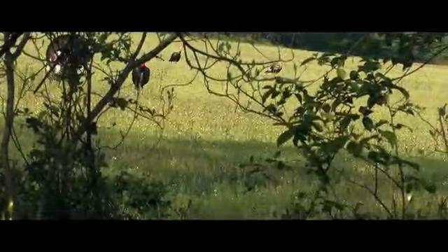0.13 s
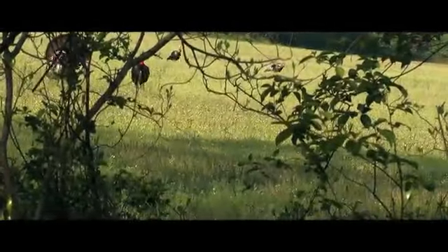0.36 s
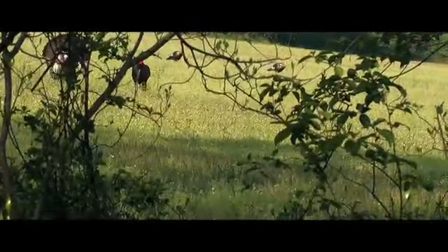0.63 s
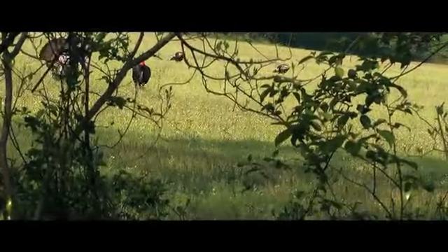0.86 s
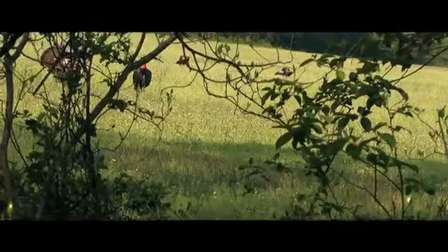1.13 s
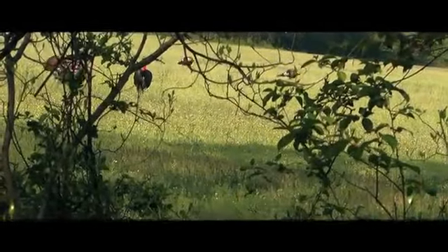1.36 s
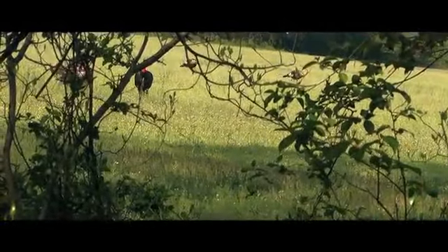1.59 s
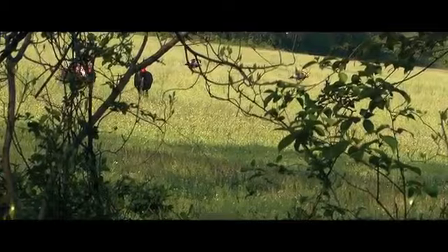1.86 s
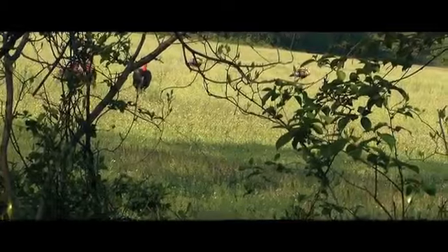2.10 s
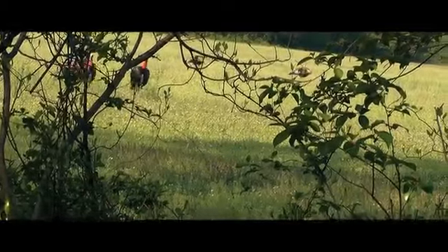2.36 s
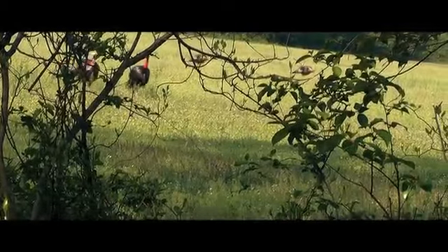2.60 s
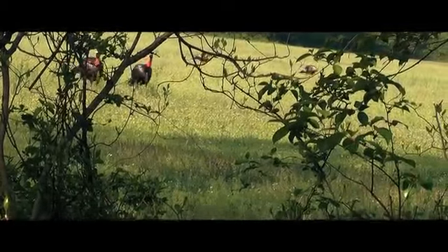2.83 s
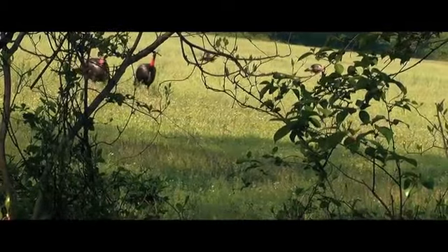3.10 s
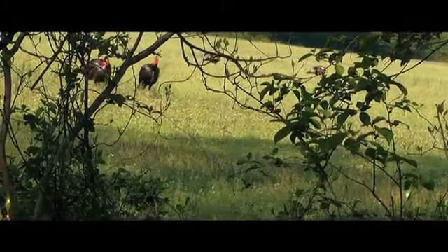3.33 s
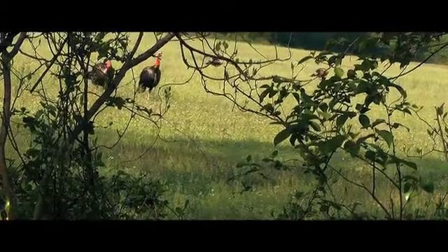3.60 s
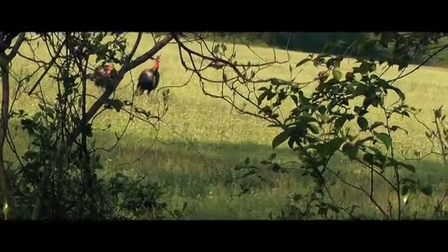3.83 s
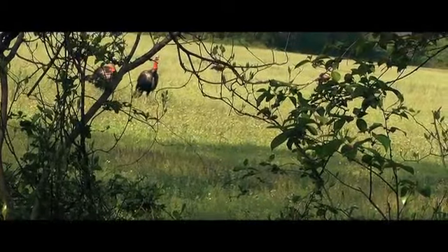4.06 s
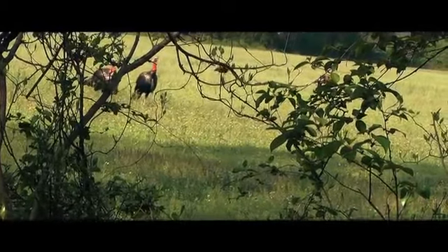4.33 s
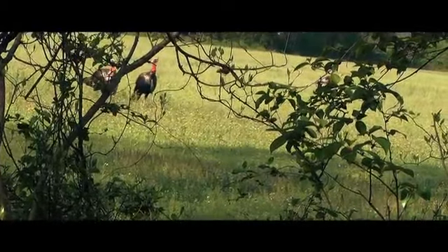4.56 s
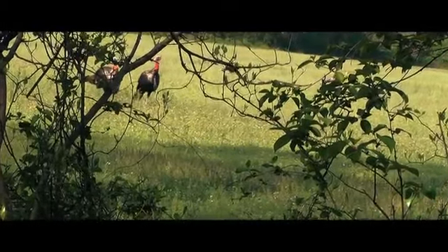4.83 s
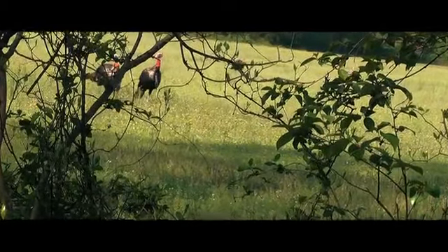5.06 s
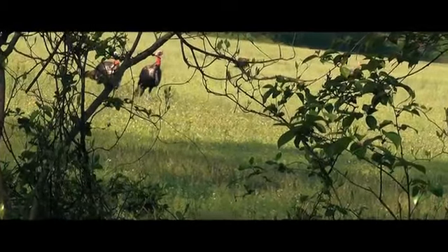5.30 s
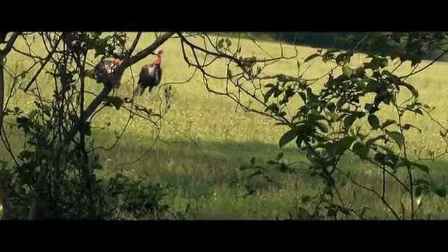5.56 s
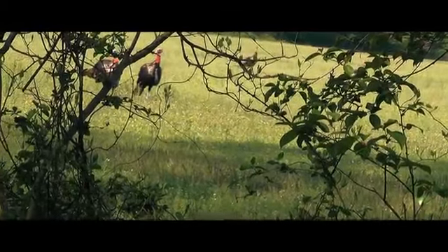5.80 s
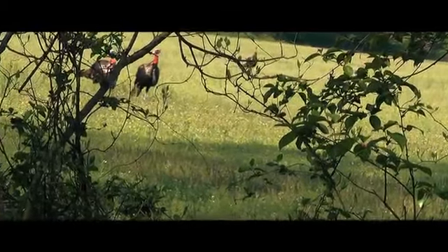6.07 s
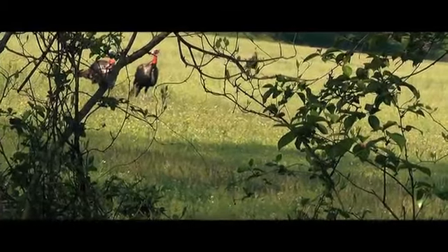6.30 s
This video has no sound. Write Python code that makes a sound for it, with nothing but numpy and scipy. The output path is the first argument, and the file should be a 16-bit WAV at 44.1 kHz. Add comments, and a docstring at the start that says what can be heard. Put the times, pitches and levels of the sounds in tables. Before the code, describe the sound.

Lively songbirds near and far over a soft low country rumble, with soft bumps and a leafy rustle. A turkey hen then calls slightly to the right, ten short nasal yelps in steady rhythm, each dropping quickly from a higher start, growing hoarse. Thin falling bird slurs quicken behind her, with a faint insect buzz and dim hoot. Afterwards quiet whistles and small clicks; outdoor stereo microphone in the hedge.

```python
"""Songbirds over a low country rumble, one with eight even upswept notes; then a hen turkey yelps ten times.
The field edge is heard from inside a hedge; a hoot, an insect buzz, leafy rustles, soft thumps and twig ticks join in.
Yelps are syrinx partials and breath noise through a moving beak resonance; birds are gliding sines.
Hoot, buzz, rustles and thumps are resonated noise or clicks, ticks are damped sines, the air is shaped noise.
Sparse random echoes stand for the trees."""
import sys
import numpy as np
from scipy import signal
from scipy.fft import next_fast_len
from scipy.io import wavfile
from scipy.ndimage import uniform_filter1d

SR = 44100
rng = np.random.default_rng(int(sys.argv[2]) if len(sys.argv) > 2 else 0)


def master_out(mix):
    """Clip the mix to full scale and print it as 16-bit PCM to the path in sys.argv[1]."""
    frames = np.transpose(np.atleast_2d(mix))
    ceiling = np.clip(frames, -1, 1)
    pcm = np.round(ceiling * 32767).astype(np.int16)
    wavfile.write(sys.argv[1], SR, pcm)


def rack_gain(trim_db):
    """Turn a fader trim in dB into the linear factor to multiply a signal by."""
    fader = np.asarray(trim_db, float)
    return 10 ** (fader / 20)


N = 283116

# Beak opening. Each row: time after the yelp's start in s, share of the open resonance.
BEAK_OPENING = [(.006, .42), (.017, 0.69), (.026, 0.87), (.05, .99)]
# Beak fully shutting. Each row: time before the yelp's end in s, share of the open resonance.
BEAK_SHUTTING = [(.005, 0.41), (.028, .68), (.05, .9), (.08, 0.94)]
# Syrinx partials 2 and 3 before the beak, in dB.
SYRINX_DB = (-5.5, -4.5)
# Partials 4 up. Each row: frequency in Hz, level relative to the voice in dB.
OVERTONES = [(2400, -24), (3200, -40.5), (3900, -27), (4800, -53), (6500, -78.5), (8000, -58.5),
             (9000, -92), (10000, -48.5)]
# Throat resonances for the breath. Each row: centre in Hz, width in Hz, relative level in dB.
THROAT = [(842, 130, -10), (1500, 520, -2.5), (1900, 28, -1.5), (2500, 460, -13), (4000, 200, -16),
          (8000, 140, -29.5), (10000, 290, -40)]


def yelp(rows, open_hz, bright_db, rasp_db, shut):
    """Syrinx partials through an opening and shutting beak, shaken by rasp, with throat breath noise."""
    hz, push_db = curve(rows)
    count = len(hz)
    t = np.arange(count) / SR
    opening = np.interp(t, *np.transpose(BEAK_OPENING))
    shutting = np.interp(t[::-1], *np.transpose(BEAK_SHUTTING))
    beak_hz = open_hz * np.minimum(opening, 1 - shut * (1 - shutting))

    partials = []
    for k, db in enumerate([0, *np.add(SYRINX_DB, bright_db)], 1):
        level_db = push_db + db
        if k == 2:
            level_db = level_db + 3 * wobble(count, 46)
        partials.append(rack_gain(level_db) * beak_gain(k * hz, beak_hz))
    voice = np.sqrt(sum(p ** 2 for p in partials))

    rough = rack_gain(rasp_db)
    turns = np.cumsum(hz * (1 + .03 * rough * wobble(count, 260))) / SR
    # a slow second oscillator makes sidebands
    flutter = np.cos(2 * np.pi * np.cumsum(165 * (1 + 0.12 * wobble(count, 33))) / SR)
    tremble = 1 + rough * (flutter + .5 * wobble(count, 210))
    low, high = 0, 0
    for k, partial in enumerate(partials, 1):
        shake = 1 + (tremble - 1) * (k - 1) / 2  # the first partial stays smooth
        low = low + partial * shake * np.cos(2 * np.pi * k * turns)
    for k in range(4, 16):
        high = high + rack_gain(read(OVERTONES, k * hz)) * np.cos(2 * np.pi * k * turns)
    high = voice * high

    puffs = (3.6 + np.exp(-(turns % 1) / 0.076)) * rng.standard_normal(count)  # air escapes once a cycle
    breath = sum(rack_gain(db) * evened(resonate(puffs, f, width)) for f, width, db in THROAT)
    sound = np.sqrt(2) * (low + tremble * high) + rough * voice * breath
    return sound * signal.windows.tukey(count, .05)


def beak_gain(hz, beak_hz):
    """Beak resonance, steep loss above it, and a side cavity that cancels a band below it."""
    resonance_width_hz, notch_width_hz = 206, 516
    notch_hz = 0.69 * beak_hz
    notch = abs(1 - (hz / notch_hz) ** 2 + 1j * hz * notch_width_hz / notch_hz ** 2)
    resonance = abs(1 - (hz / beak_hz) ** 2 + 1j * hz * resonance_width_hz / beak_hz ** 2)
    loss = np.hypot(1, (hz / beak_hz / 1.32) ** 4)
    return notch / loss / resonance


# One table a yelp. Each row: time in s, pitch in Hz, effort in dB.
YELPS = [
    [(1.724, 602, -77), (1.745, 604, -44), (1.79, 627, -42.5), (1.82, 621, -51.5), (1.838, 624, -76)],
    [(2.109, 906, -62), (2.119, 842, -61), (2.149, 644, -44), (2.19, 604, -38), (2.235, 569, -37.5),
     (2.263, 581, -41), (2.29, 714, -69)],
    [(2.508, 760, -69.5), (2.524, 732, -45), (2.54, 616, -38.5), (2.57, 578.5, -35), (2.606, 572, -36),
     (2.628, 613, -42), (2.652, 688, -69)],
    [(2.852, 752, -64), (2.86, 770, -53.5), (2.873, 605, -34.5), (2.903, 539.7, -38.5), (2.911, 595, -33.5),
     (2.971, 558, -43), (2.999, 605, -47.5), (3.027, 640, -58)],
    [(3.179, 759, -73.5), (3.187, 787, -46.5), (3.198, 636.3, -39), (3.225, 623.5, -32.5),
     (3.27, 546, -42.5), (3.305, 616, -50), (3.326, 646, -68)],
    [(3.482, 834, -71), (3.49, 849, -45), (3.504, 637.5, -36), (3.546, 621.8, -32), (3.602, 611.3, -42),
     (3.635, 635, -44), (3.658, 673, -61.5)],
    [(3.783, 763, -76.5), (3.791, 760, -47), (3.801, 650, -38), (3.817, 626.6, -35.5), (3.863, 637.4, -38),
     (3.887, 654, -46.5), (3.917, 661, -50.5), (3.937, 700, -71.5)],
    [(4.069, 813, -77), (4.077, 757, -48.5), (4.089, 643.5, -39), (4.129, 653.7, -36), (4.18, 655, -43.5),
     (4.206, 681, -49), (4.232, 712, -63.5)],
    [(4.356, 810, -80), (4.364, 786, -45), (4.376, 650.3, -40), (4.414, 641.5, -39.5), (4.45, 639.4, -42.5),
     (4.492, 668, -47.5), (4.518, 719, -64)],
    [(4.653, 765, -82), (4.661, 761, -46), (4.671, 635, -38.5), (4.709, 587.3, -36.5), (4.757, 612, -45.5),
     (4.783, 631, -52.5), (4.807, 640, -63)],
]
# Each row, one a yelp: open beak resonance in Hz, gain of partials 2 and 3 in dB, rasp and breath in dB.
YELP_VOICES = [(1500, -21.5, -23), (1410, -20.5, -30), (1467, -6, -23.5), (1790, -3, -16.5),
               (1912, 1.5, -14), (1870, 1, -17), (1900, 4.5, -18.5), (1897, 4, -11.5), (1880, 4, -10.5),
               (1830, -0.5, -17)]
# Beak closure at the end of each yelp, 0-1.
SHUT_DEPTHS = [0.64, .6, .6, .6, .65, 0.96, 0.97, 0.94, 0.98, .7]


def hen_turkey():
    """Ten yelps a little to the right, with weak scatter from the trees."""
    hen = np.zeros(N)
    for rows, voice, shut in zip(YELPS, YELP_VOICES, SHUT_DEPTHS):
        add(hen, rows[0][0], yelp(rows, *voice, shut))
    return ports(hen, -.8, -.3) + rack_gain(-21) * treeline(hen, .4, .75)


def songbirds():
    """Near birds, each group in its own direction, with the echo of the trees."""
    out = ports(falling_notes() + rising_notes(), .01, 0.077)
    out += ports(phrases() + chips(), .4, 0.39)
    out += ports(slurs(), .4, .32)
    out += ports(single_whistles(), .3, 0.19)
    return out + rack_gain(-3) * treeline(out.mean(0), .6, .7)


# Upswept figure. Each row: time in s, pitch in Hz, level in dB.
RISE = [(0, 1500, -12), (.06, 1900, -10), (.085, 2600, -12), (.1, 3610, 0.5), (.112, 4100, 4)]


def rising_notes():
    """Eight even upswept sines; the fade grows with the square of the count."""
    start_s, gap_s, first_db, fade_db = 0.00103, .195, -42.5, -0.0706
    return sing(RISE, [(start_s + k * gap_s, first_db + k ** 2 * fade_db) for k in range(8)])


# Downswept figure. Each row: time in s, pitch in Hz, level in dB.
FALL = [(0, 3900, -4), (.015, 3100, -3), (.03, 2200, 0), (.07, 1650, -1)]
# Each row: start in seconds, level in dB.
FALL_STARTS = [(.66, -59), (.96, -58), (1.328, -59), (1.652, -59), (1.982, -60)]


def falling_notes():
    """A repeated sine that drops in pitch."""
    return sing(FALL, FALL_STARTS)


# Song figures. Each row: time in s, pitch in Hz, level in dB.
HOOK = [(0, 2250, -7), (.02, 2800, -0.5), (.04, 3090, -1), (.09, 3180, -7.5)]
WARBLE = [(0, 4110, -3.5), (.022, 4210, -1.5), (.034, 3890, 2.5), (.046, 4200, -4), (.07, 4100, -5.5)]
BLIP = [(0, 3350, -1), (.014, 3580, 2.5), (.028, 3550, -37)]
PIPE = [(0, 2790, 5), (.02, 2735, -0.5), (.055, 2680, -22)]
CHIP = [(0, 6400, -21.5), (.008, 5250, -2), (.0145, 4800, -5), (.022, 4550, 4.5)]
DIP = [(0, 2500, 1), (.025, 2208, -2), (.055, 2274, -6.5)]
# One phrase. Each row: figure, start after the blip in s, level in dB.
SONG = [(HOOK, -.15, -5), (WARBLE, -.067, -4), (BLIP, 0, -3), (PIPE, .031, -4.5), (CHIP, .097, -1.5),
        (DIP, .13, -5.5)]
# Each row: time of the phrase's blip in s, level in dB.
PHRASES = [(.122, -42.5), (.48, -43), (.84, -43.5), (3.84, -45), (4.2, -43.5), (4.56, -44), (4.92, -43)]
# The song breaks off after this first note. Each row: start in seconds, level in dB.
LAST_HOOK = [(5.13, -49.5)]


def phrases():
    """One bird's song: six gliding sine figures in each phrase, then a lone hook."""
    starts = np.array(PHRASES)
    song = sum(sing(figure, starts + [after_s, db]) for figure, after_s, db in SONG)
    return song + sing(HOOK, LAST_HOOK)


# Each row: start in seconds, level in dB.
CHIP_STARTS = [(0.624, -54), (0.766, -57), (0.84, -50.5), (1.044, -53), (1.259, -51)]


def chips():
    """Lone chips: short, steeply falling sines."""
    return sing(CHIP, CHIP_STARTS)


# Slur before stretching. Each row: time in s, pitch in Hz, level in dB.
SLUR = [(0, 4398, 3), (.02, 4243, -1), (.05, 3750, 3.5), (.072, 3410, -10.5)]
# Each row: start in seconds, level in dB.
SLUR_STARTS = [(1.648, -59), (1.924, -55.5), (2.12, -57), (2.257, -58.5), (2.384, -61), (2.5, -62),
               (2.603, -61), (2.704, -60.5), (2.786, -61), (2.919, -57.5), (3.01, -62.5), (3.095, -61),
               (3.186, -68)]


def slurs():
    """Falling sines that shorten as the run quickens."""
    usual_gap_s, stretch_power = 0.15, .6
    bird = np.zeros(N)
    gaps_s = np.gradient(np.transpose(SLUR_STARTS)[0])
    for (s, db), gap_s in zip(SLUR_STARTS, gaps_s):
        stretch = (gap_s / usual_gap_s) ** stretch_power
        add(bird, s, whistle(np.array(SLUR) * [stretch, 1, 1], db))
    return bird


# Other birds. Each row: start in seconds, length in s, start pitch in Hz, end pitch in Hz, level in dB.
WHISTLES = [(0.427, 0.047, 4620, 4280, -51.5), (0.655, .03, 4600, 4330, -49.5),
            (.744, .036, 3790, 3790, -52), (0.927, 0.047, 3375, 3263, -47), (1.05, 0.055, 3016, 2834, -48),
            (1.084, 0.03, 4520, 4170, -48), (1.085, 0.061, 3200, 2940, -52),
            (1.163, 0.034, 3780, 3610, -52.5), (1.298, 0.027, 4380, 4530, -53.5),
            (1.37, 0.042, 3850, 3610, -52.5), (1.581, 0.099, 3200, 2790, -50),
            (1.835, 0.024, 790, 730, -51.5), (1.85, 0.11, 1650, 1648, -52.5), (2.064, .15, 2820, 2674, -60),
            (2.26, 0.053, 2165, 2175, -51.5), (2.421, 0.099, 2994, 2830, -51.5),
            (2.499, .11, 2274, 2310, -60), (2.925, .046, 3320, 3154, -47.5),
            (3.042, 0.041, 3030, 2775, -47), (3.107, 0.062, 2150, 2450, -52),
            (4.378, 0.022, 3320, 3307, -46), (5.322, 0.08, 2714, 2120, -56), (5.418, .06, 2000, 1900, -57),
            (5.42, .08, 3000, 2840, -61), (5.601, 0.067, 2900, 3190, -57), (5.645, .022, 2570, 2380, -52),
            (5.862, 0.039, 3050, 2500, -56), (5.926, .13, 2920, 2000, -57), (6.051, 0.041, 2025, 1870, -58),
            (6.181, 0.065, 3245, 3440, -53.5), (6.189, 0.16, 4430, 4494, -64),
            (6.227, 0.047, 3230, 2200, -53), (6.268, .035, 2210, 2610, -56),
            (6.308, 0.067, 3118, 2306, -52.5), (6.378, 0.043, 2200, 2306, -56)]


def single_whistles():
    """Single straight glides, strongest halfway."""
    bird = np.zeros(N)
    for s, length_s, start_hz, end_hz, db in WHISTLES:
        middle_hz = (start_hz + end_hz) / 2
        figure = [(0, start_hz, -3), (length_s / 2, middle_hz, 0), (length_s, end_hz, -4)]
        add(bird, s, whistle(figure, db))
    return bird


def sing(figure, notes):
    """One figure repeated at the given moments; a note begun before 0 s loses its head."""
    bird = np.zeros(N)
    for s, db in notes:
        add(bird, max(s, 0), whistle(figure, db)[round(max(-s, 0) * SR):])
    return bird


def whistle(rows, level_db):
    """A near sine that follows a figure of pitch and level."""
    hz, shape_db = curve(rows)
    shape_db = shape_db + 2.28 * wobble(len(hz), 150)  # a small random wavering of level roughens the tone
    tone = np.sin(2 * np.pi * np.cumsum(hz) / SR)
    return np.sqrt(2) * rack_gain(level_db + shape_db) * tone * signal.windows.tukey(len(hz), .3)


# Each row: start in seconds, length in s, level in dB.
HOOTS = [(.7, 0.985, -55), (3.05, 1.25, -53)]


def hoots():
    """A low fuzzy hoot: noise in a narrow resonance."""
    out = np.zeros(N)
    for s, length_s, db in HOOTS:
        fuzz = evened(resonate(rng.standard_normal(round(length_s * SR)), 423, 100))
        add(out, s, rack_gain(db) * fuzz * signal.windows.tukey(len(fuzz), 0.28))
    return out


# Each row: start in seconds, length in s, level in dB.
BUZZES = [(2.052, .175, -58.5), (3.276, .4, -62.5)]


def insect_buzz():
    """Uneven wing-stroke clicks and a little noise through a resonance."""
    stroke_hz = 146
    out = np.zeros(N)
    for s, length_s, db in BUZZES:
        strokes = np.diff(np.floor(np.arange(length_s * SR) * stroke_hz / SR))  # one click a wing stroke
        strokes = strokes * (1 + .2 * rng.standard_normal(len(strokes)))
        strokes = strokes + .04 * rng.standard_normal(len(strokes))
        buzz = evened(resonate(strokes, 4600, 520))
        add(out, s, rack_gain(db) * buzz * signal.windows.tukey(len(buzz), .2))
    return out


# Each row: start in seconds, length in s, centre in Hz, width in Hz, level in dB.
RUSTLES_AND_THUMPS = [(0.029, 0.19, 5770, 4000, -63), (0.117, 0.11, 550, 256, -52),
                      (0.271, 0.16, 706, 463, -44.5), (0.575, 0.12, 558, 400, -49.5),
                      (1.755, 0.13, 4580, 8000, -53.5), (1.817, 0.24, 5690, 5560, -60),
                      (5.157, 0.27, 6300, 2200, -64.5)]


def rustles_and_thumps():
    """Broad leafy rustles and low soft thumps: grainy resonated noise, swelling and fading."""
    out = np.zeros(N)
    for s, length_s, hz, width_hz, db in RUSTLES_AND_THUMPS:
        count = round(length_s * SR)
        grains = rng.standard_normal(count) * rack_gain(wobble(count, 150))
        add(out, s, rack_gain(db) * evened(resonate(grains, hz, width_hz)) * np.hanning(count))
    return out


# Each row: start in seconds, pitch in Hz, level in dB.
TICKS = [(5.611, 1230, -28), (6.245, 760, -33), (6.246, 4000, -35)]


def twig_ticks():
    """Sines that swell and die within a few cycles."""
    out = np.zeros(N)
    for s, hz, db in TICKS:
        turns = np.arange(600) * hz / SR
        add(out, s, rack_gain(db) * turns * np.exp(-turns / 1.25) * np.sin(2 * np.pi * turns))
    return out


# Pitch range of the far birds: lowest in Hz, highest in Hz.
CHORUS_HZ = (1735, 4100)
# Each row: time in s, relative level in dB.
CHORUS_LEVEL = [(0, -57), (.6, -55), (1.2, -56), (1.702, -56.5), (2.799, -64), (3.6, -54), (4.6, -55.5),
                (5.202, -60), (5.8, -65.5), (6.42, -56.5)]


def chorus():
    """Faint gliding notes from birds too far to follow, scattered left and right, with tree echo."""
    notes_per_s = 160
    low_hz, high_hz = CHORUS_HZ
    out = np.zeros((2, N))
    for at, pitch, glide, length, size, side in rng.random((round(notes_per_s * N / SR), 6)):
        hz = low_hz * (high_hz / low_hz) ** pitch
        end_hz = hz * (1 + 0.252 * (glide - .5))
        note = whistle([(0, hz, 0), (0.016 + 0.043 * length, end_hz, 0)], -12 * size)
        add(out[0], at * N / SR, note * (1 + .5 * (side - .5)))
        add(out[1], at * N / SR, note * (1 - .5 * (side - .5)))
    far = evened(out) * rack_gain(np.interp(np.arange(N) / SR, *np.transpose(CHORUS_LEVEL)))
    return rack_gain(-2) * far + rack_gain(-1) * treeline(far.mean(0), 0.52, 0.91)


# Air spectrum. Each row: frequency in Hz, relative level in dB.
AIR_SPECTRUM = [(15, -42), (25, -8.5), (80, 1.5), (174, -9.5), (229, -11), (431, -17), (540, -13.5),
                (645, -18), (1520, -19), (2450, -23), (5220, -33), (10300, -42), (13400, -68.5),
                (22000, -120)]
# Stereo width. Each row: frequency in Hz, side relative to mid in dB.
AIR_WIDTH = [(60, -44.5), (170, -26), (470, -17.5), (1330, -16), (3720, -7.5), (10400, 3)]


def air():
    """Rumble and hiss of open country: near mono in the bass, wide in the treble."""
    frames, hz = N // 256 + 5, np.fft.rfftfreq(1024, 1 / SR)
    a, b, c, d, patches = rng.standard_normal((frames, 513, 5)).T
    # level drifts in patches of frequency and time
    patches = evened(uniform_filter1d(uniform_filter1d(patches, 10, 0), 14, 1))
    mid = a + 1j * b
    side = (c + 1j * d) * rack_gain(read(AIR_WIDTH, hz))[:, None]
    level = rack_gain(read(AIR_SPECTRUM, hz)[:, None] + 1.15 * patches)
    z = np.array([mid + side, mid - side]) * level
    return rack_gain(-48) * evened(signal.istft(z, nperseg=1024, noverlap=768)[1][:, :N])


def treeline(x, t60_s, same):
    """Scatter from trunks and leaves: sparse taps of random sign, dying away, partly alike at both ears."""
    slots = np.arange(300, SR // 2, 22)
    at = slots + rng.integers(0, 22, (2, len(slots)))
    taps = np.zeros((2, SR))
    np.put_along_axis(taps, at, rng.choice([-1., 1.], at.shape) * rack_gain(-60 * at / SR / t60_s), 1)
    taps = same * taps[0] + (1 - same) * np.array([taps[1], -taps[1]])
    return signal.fftconvolve(x[None], taps / np.linalg.norm(taps[0]), axes=1)[:, :N]


def ports(x, lean_db, lead_rad):
    """A close pair of microphone ports: a source off centre differs a little in level and phase."""
    wave = signal.hilbert(x, next_fast_len(N))[:N]
    left = rack_gain(lean_db / 2) * (wave * np.exp(.5j * lead_rad)).real
    right = rack_gain(-lean_db / 2) * (wave * np.exp(-.5j * lead_rad)).real
    return np.array([left, right])


def evened(x):
    """Scales to rms 1."""
    return x / np.sqrt(np.mean(x ** 2) + 1e-20)


def read(points, hz):
    """Reads a spectrum on a log-frequency axis."""
    f, value = np.transpose(points)
    return np.interp(np.log(hz + 1), np.log(f + 1), value)


def add(mix, s, sound):
    """Mixes a sound in at s seconds."""
    part = mix[round(s * SR):][:len(sound)]
    part += sound[:len(part)]


def curve(rows):
    """Joins rows by straight lines, one value a sample."""
    s, *columns = np.transpose(rows)
    t = np.arange(s[0], s[-1], 1 / SR)
    return [np.interp(t, s, c) for c in columns]


def resonate(x, hz, width_hz):
    """A steep resonance of gain 1: shift down, smooth twice, shift back."""
    turn = np.exp(2j * np.pi * hz * np.arange(len(x)) / SR)
    r = np.exp(-np.pi * width_hz / SR)
    return 2 * (turn * signal.lfilter([(1 - r) ** 2], [1, -2 * r, r * r], x / turn)).real


def wobble(count, hz):
    """Smooth chance of rms 1, changing about hz times a second."""
    size = max(round(SR / hz), 1)
    return evened(uniform_filter1d(uniform_filter1d(rng.standard_normal(count), size), size))


def scene():
    """The hen, the near birds, the small sounds, the far birds and the air."""
    small = hoots() + insect_buzz() + rustles_and_thumps() + twig_ticks()
    return hen_turkey() + songbirds() + ports(small, .2, 0.14) + chorus() + air()


def roll_off(x):
    """The treble ends steeply here."""
    return signal.sosfilt(signal.butter(12, 11050, fs=SR, output="sos"), x)


def record(dry):
    """Cuts the treble steeply above 10400 Hz and finishes the mix."""
    edge = signal.firwin(511, 10400, window=("kaiser", 9), fs=SR)
    mix = signal.oaconvolve(dry, edge[None], "same")
    return roll_off(mix)


dry = scene()
out = record(dry)
master_out(out)
```